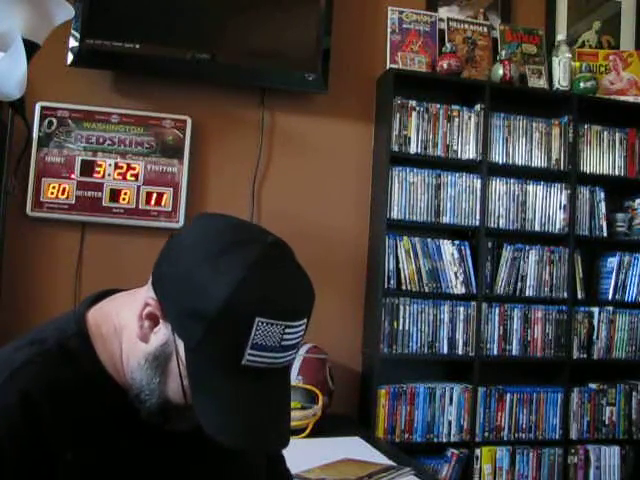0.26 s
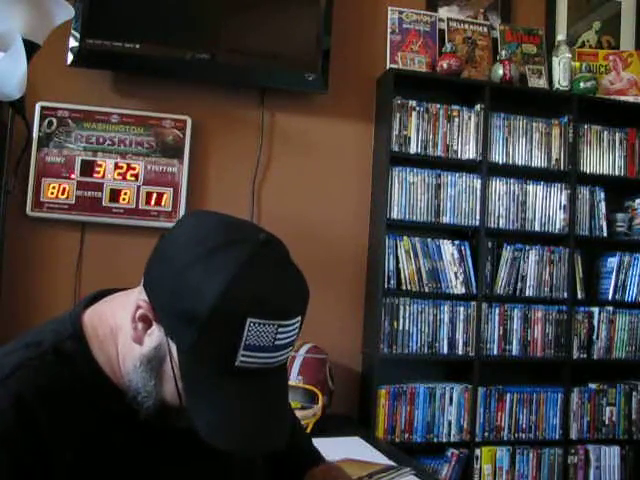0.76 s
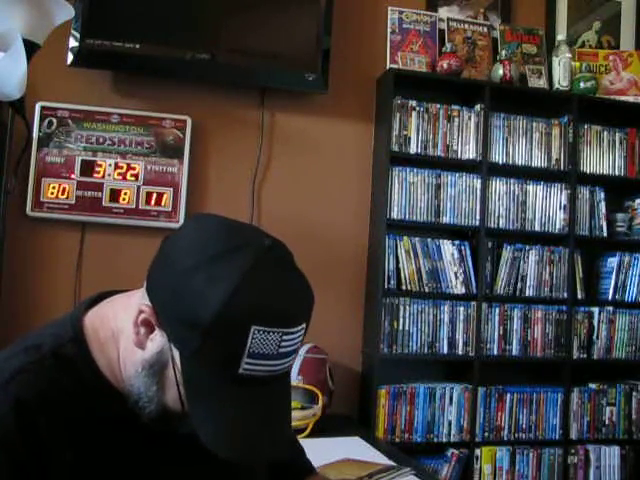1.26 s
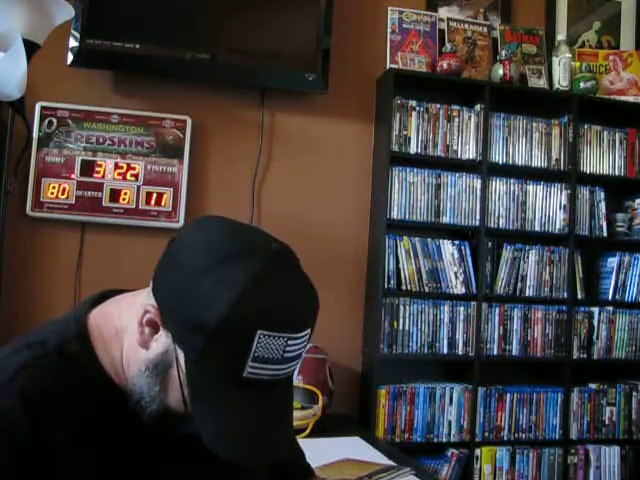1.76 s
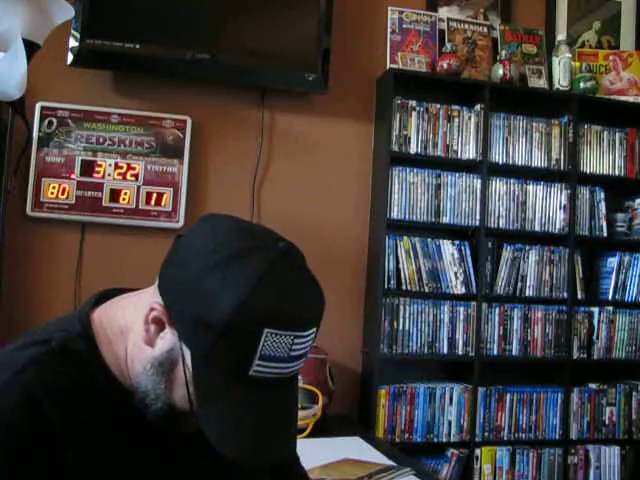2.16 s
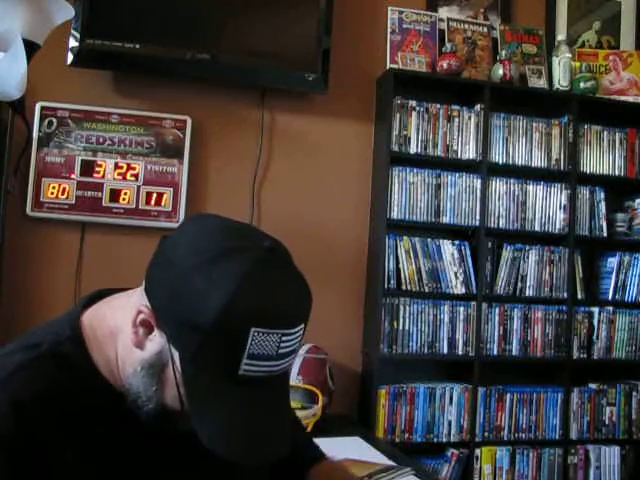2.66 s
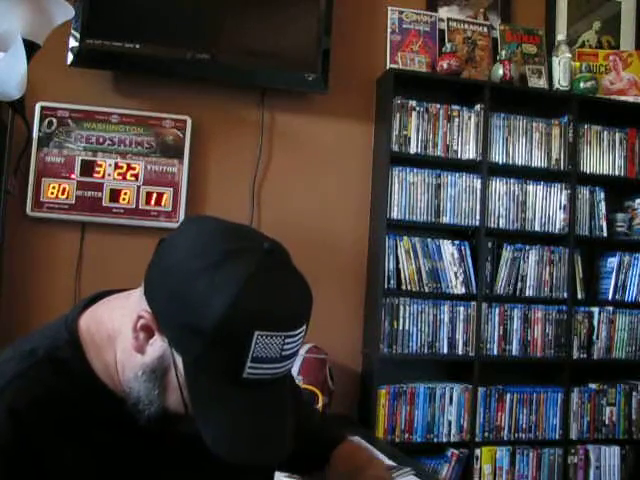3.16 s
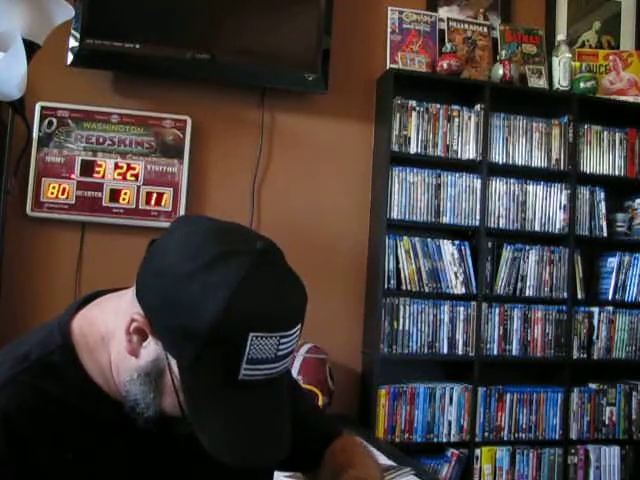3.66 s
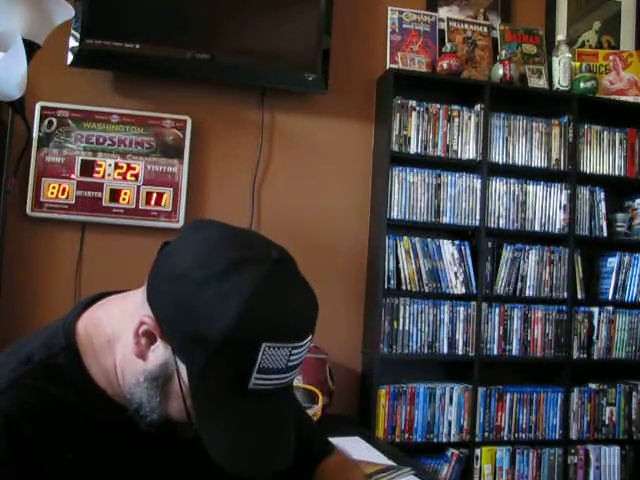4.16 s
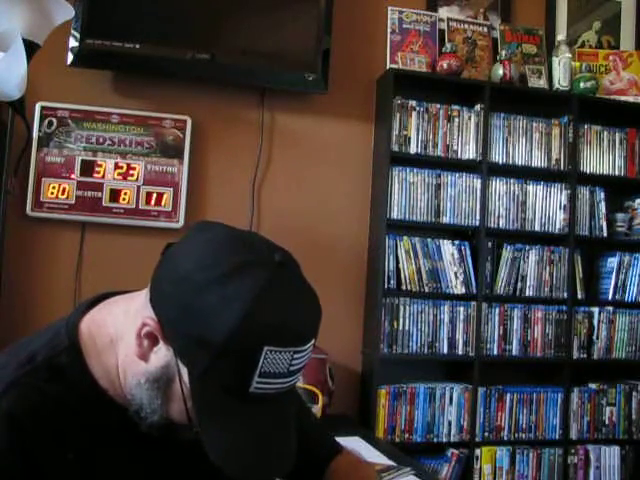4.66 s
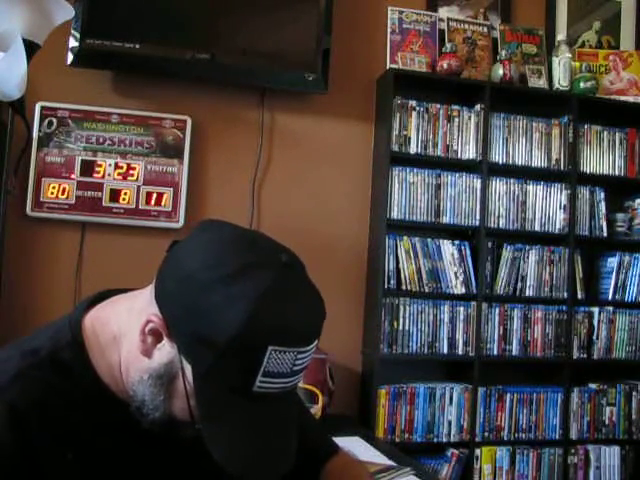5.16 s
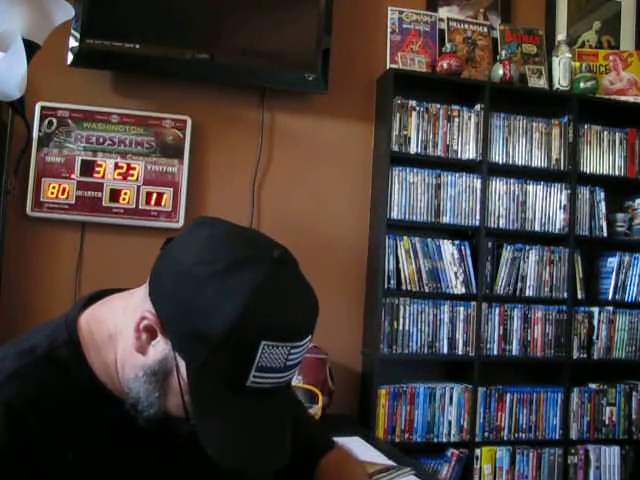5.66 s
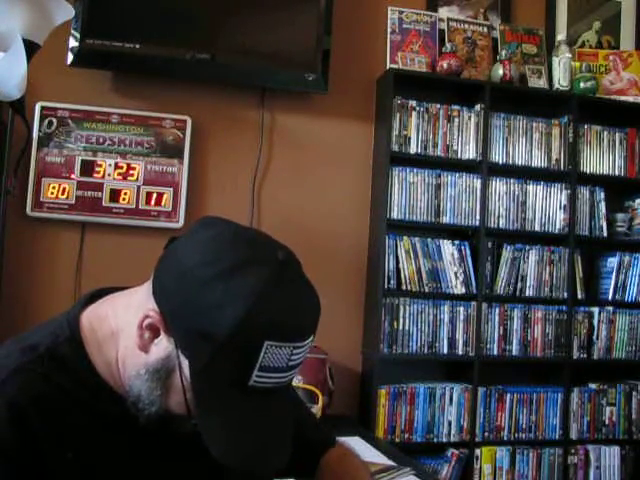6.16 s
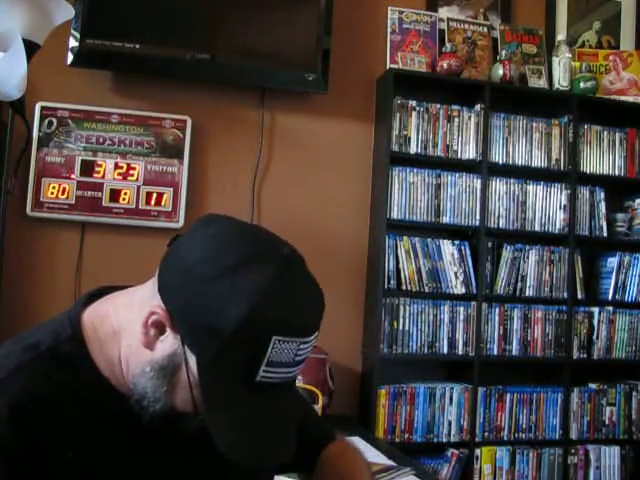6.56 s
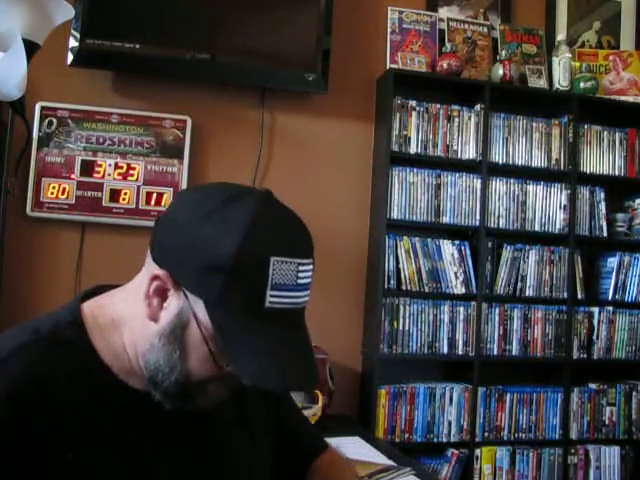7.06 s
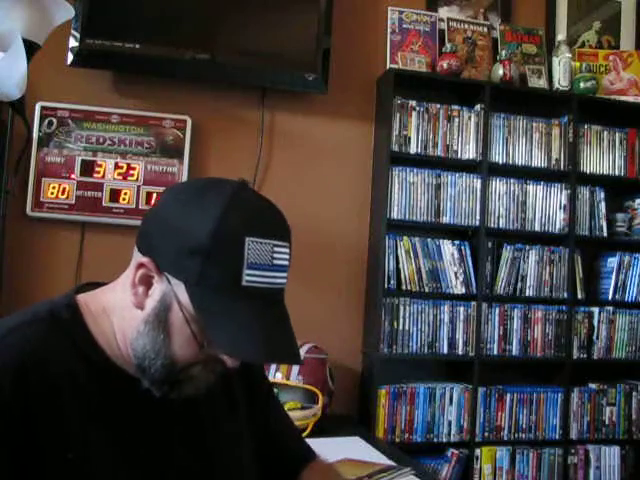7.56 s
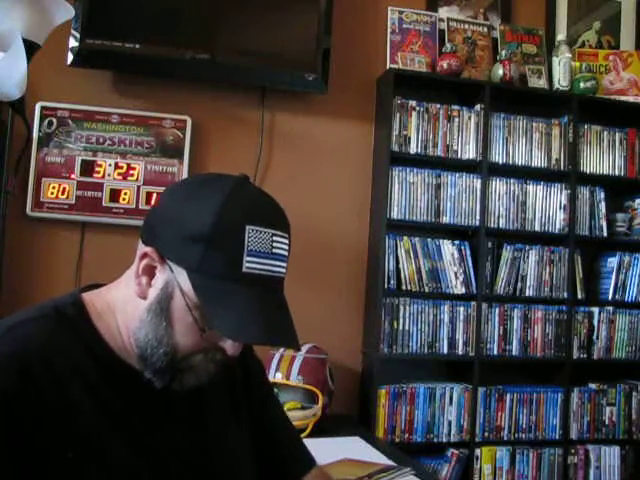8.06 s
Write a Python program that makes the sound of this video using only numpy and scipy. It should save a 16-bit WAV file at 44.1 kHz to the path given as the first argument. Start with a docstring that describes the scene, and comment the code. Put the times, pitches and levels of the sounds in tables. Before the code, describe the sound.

A package is being unwrapped close to the microphone in a small room with a short echo, over a faint electrical hum and low rumble. Two sharp snaps of stiff wrapping come right at the start, followed by a few light rustles. Around 2 seconds there is a brief scuff and a very short, sharp rip of packing tape. Sparse ticks and crackles follow until a small tape rasp near 4 seconds. From about 4.5 seconds the handling grows busier: hands drag over the wrapping with a slightly hollow rub, and tape rasps at 5 seconds and again near 6. The loudest stretch runs from about 6.3 to 7.7 seconds, with crinkling, hard snaps of buckling folds and a quick run of short tape pulls. Another rasp comes near 8 seconds, and rustling and snaps continue to the end at about 8.4 seconds.

```python
"""At a desk in a small furnished room, packing tape is pulled off a wrapped package.
The tape lets go in quick rasps as its threads of adhesive break. The stiff wrapping snaps
where a fold buckles, and rustles and crinkles as hands slide over it. All of it is coloured
by the package's panels and the short room tail. A faint mains hum and room rumble lie underneath."""
import sys
import numpy as np
from scipy import signal
from scipy.fft import rfft, irfft
from scipy.io import wavfile

SR = 44100
rng = np.random.default_rng(int(sys.argv[2]) if len(sys.argv) > 2 else 0)


def transcribe(signal):
    """Save signal, clipped to [-1, 1], as a 16-bit WAV file at the path in sys.argv[1]."""
    frames = np.atleast_2d(signal).T
    limited = np.clip(frames, -1, 1)
    pcm = np.round(limited * 32767).astype(np.int16)
    wavfile.write(sys.argv[1], SR, pcm)


N = 366030
TIME = np.arange(N) / SR


def from_db(db):
    """Decibels to gain."""
    return 10 ** (np.asarray(db) / 20)


def unit_energy(x):
    """Scale so that the squares sum to one."""
    return x / np.sqrt(np.sum(x ** 2) + 1e-20)


def add(track, start_s, sound):
    """Mix a short sound into a track."""
    at = max(round(start_s * SR), 0)
    track[at:at + len(sound)] += sound[:N - at]


def response(outline, size=2048):
    """Minimum-phase impulse response of an EQ curve given as (Hz, dB) points."""
    hz, db = np.transpose(outline)
    grid_hz = np.maximum(np.arange(size // 2 + 1) * SR / size, 1)
    gain = from_db(np.interp(np.log(grid_hz), np.log(hz), db))
    cepstrum = irfft(np.log(gain))
    causal = np.r_[1, np.full(size // 2 - 1, 2), np.zeros(size // 2)]
    return irfft(np.exp(rfft(cepstrum * causal)))


def through(x, impulse):
    """Filter x by an impulse response, keeping its length."""
    return signal.fftconvolve(x, impulse)[:len(x)]


def tint(x, body_db, treble_db, body_hz=850, treble_hz=5400):
    """Three-band EQ: weight the body and the treble against the middle."""
    def split(sound, hz):
        filters = [signal.butter(2, hz, kind, fs=SR, output="sos") for kind in ("low", "high")]
        return [signal.sosfilt(np.tile(sos, (2, 1)), sound) for sos in filters]
    low, rest = split(x, body_hz)
    middle, high = split(rest, treble_hz)
    return from_db(body_db) * low + middle + from_db(treble_db) * high


def resonate(x, resonances):
    """Lift one band for each damped resonance."""
    for hz, width_hz, lift_db in resonances:
        band = signal.lfilter(*signal.iirpeak(hz, hz / width_hz, fs=SR), x)
        x = x + (from_db(lift_db) - 1) * band
    return x


def drift(per_s, size=N):
    """A random wander with a spread near one."""
    knots = rng.standard_normal(int(size / SR * per_s) + 2)
    return np.interp(np.arange(size) * per_s / SR, np.arange(len(knots)), knots)


def grains(per_s, spread_db, size=N):
    """Tiny random clicks of uneven strength, at an rms of one."""
    fires = rng.random(size) < per_s / SR
    strength = from_db(spread_db * np.clip(rng.standard_normal(size), -2, 2))
    return unit_energy(fires * strength * rng.choice([-1, 1], size)) * np.sqrt(size)


def stereo(mid, side):
    """Left and right from mid and side; the microphone's close ports nearly agree in the bass."""
    # Stereo width. Each row: frequency in Hz, side gain in dB.
    width = [(100, -13.5), (400, -12.5), (650, -7.5), (1200, -7.5), (2500, -3), (8000, 0.5), (13000, 0)]
    return mid + through(side, response(width)) * np.array([[1], [-1]])


def room(x, wet_db, t60_s=0.29, build_s=0.0069, scatter_db=-7, scatter_s=0.00038):
    """Direct sound, scatter from the desk, two near echoes and a short diffuse tail."""
    # Tone of the tail. Each row: frequency in Hz, gain in dB.
    colour = [(150, -3.5), (400, -0.5), (1000, 2), (2200, 4), (4500, -0.5), (8000, -1.5), (14000, -0.5)]
    # Bounces off the nearest surfaces. Each row: delay in seconds, level in dB.
    echoes = [(0.0122, -12), (0.0192, -23)]
    t = TIME[:SR // 2]
    decay = from_db(-60 * t / t60_s) * np.clip(t / build_s, 0, 1)
    tails = [unit_energy(rng.standard_normal(len(t)) * decay) for _ in range(2)]
    mid, side = [from_db(wet_db) * through(tail, response(colour)) for tail in tails]
    mid[0] += 1   # direct sound
    side += from_db(scatter_db) * unit_energy(rng.standard_normal(len(t)) * np.exp(-t / scatter_s))
    for delay_s, db in echoes:
        mid[round(delay_s * SR)] += from_db(db)
    return np.array([through(x, channel) for channel in stereo(mid, side)])


def room_tone(air_db=-49.5, hum_hz=120, hum_db=-53, waver_db=-2.0):
    """A bed of rumble and hiss, with a wavering hum at twice the mains rate."""
    # Spectrum of the still room. Each row: frequency in Hz, relative level in dB.
    air = [(20, -4), (38, 3.5), (70, -4.5), (130, -6.5), (200, -10.5), (500, -16.5), (1000, -19.5),
           (2000, -22), (4300, -23), (7000, -26.5), (12000, -34), (16000, -40)]
    mid, side = [through(rng.standard_normal(N), unit_energy(response(air))) for _ in range(2)]
    hum = np.sqrt(2) * np.sin(2 * np.pi * hum_hz * TIME) * from_db(hum_db + waver_db * drift(7.1))
    return from_db(air_db) * stereo(mid, side) + hum


def package(x):
    """The damped panels of the package colour every sound made on it."""
    # Panel resonances. Each row: frequency in Hz, width in Hz, lift in dB.
    panels = [(304, 55, 5.5), (458, 95, 5), (800, 47, 1), (1475, 620, 3.5)]
    return resonate(x, panels)


def sliding_hands(catches_per_s=9000, creases_per_s=110, crinkle_db=-4, stroke_db=-3, hold_db=-4):
    """Fine friction under the hands, with sparse creases popping; each stroke swells and fades."""
    # Faint rustle of holding the package. Each row: time in seconds, relative level in dB.
    hold = [(0, -53.5), (1.6, -74), (2.1, -41), (2.45, -79), (3.8, -76), (4.3, -67), (4.6, -70), (5.1, -45),
            (5.58, -50), (5.8, -42.5), (6.08, -53), (6.45, -37), (7.4, -39), (7.85, -43.5), (8.3, -47)]
    # Hand strokes. Each row: middle and length in seconds, then relative level, body and treble in dB.
    strokes = [(0.452, .2, -50, -12, 1), (0.83, 0.062, -39.5, -7, -4.5), (1.36, 0.099, -51, 12.5, -25),
               (1.842, 0.066, -34.5, 0.5, 1), (1.988, .17, -44.5, 9.5, -8), (4.125, 0.19, -38.5, -1, 2.5),
               (4.323, 0.41, -48.5, 8, -2), (4.799, 0.34, -33.5, -6, -2), (4.88, 0.12, -34, 5, 5),
               (5.125, 0.06, -32, -6, 4), (5.356, 0.04, -42.5, -15, -8), (5.463, 0.12, -36.5, -1, -6),
               (5.528, 0.056, -39.5, 17, -35), (5.733, 0.082, -40.5, -17, 4), (5.933, 0.15, -26, -12, -0.5),
               (6.147, 0.11, -32, -3, -1), (6.239, 0.056, -39, 10, 7), (6.383, 0.063, -38, 2, -4),
               (6.567, 0.14, -24.5, -1, -11), (6.798, 0.11, -37.5, 11, -6), (7.026, 0.1, -22.5, -3, -4),
               (7.144, 0.4, -35, 1.5, -15), (7.336, 0.42, -37, 14.5, 2), (7.619, 0.1, -43.5, 22, -21),
               (7.971, 0.23, -30, 8.5, -4), (8.213, 0.47, -37.5, 9.5, -2)]
    # Tone of the rubbing. Each row: frequency in Hz, relative level in dB.
    colour = [(100, -14), (300, -5.5), (700, -6.5), (1400, -3), (2400, 0), (4500, 1.5), (6500, -3),
              (10000, -7), (16000, -19.5)]
    friction = grains(catches_per_s, spread_db=3) * from_db(2.5 * drift(per_s=70))
    rustle = friction + from_db(crinkle_db) * grains(creases_per_s, spread_db=9.5)
    grip = from_db(np.interp(TIME, *np.transpose(hold)) + hold_db)
    out = grip * tint(rustle, body_db=-2, treble_db=-3)
    for middle_s, length_s, db, body_db, treble_db in strokes:
        during = np.abs(TIME - middle_s) < length_s / 2
        swell = np.cos(np.pi * (TIME[during] - middle_s) / length_s) ** 1.95
        stroke = tint(swell * rustle[during], body_db, treble_db)
        add(out, middle_s - length_s / 2, from_db(db + stroke_db) * stroke)
    return through(out, unit_energy(response(colour)))


def wrapping_drag(start_s=4.64, peak_s=4.78, end_s=4.97, hz=1430, width_hz=400, gain_db=-40):
    """One long drag of the wrapping rubs a hollow resonance."""
    band = signal.butter(2, [hz - width_hz / 2, hz + width_hz / 2], "band", fs=SR, output="sos")
    rub = unit_energy(signal.sosfilt(band, grains(per_s=1500, spread_db=4))) * np.sqrt(N)
    return from_db(gain_db) * rub * np.interp(TIME, [start_s, peak_s, end_s], [0, 1, 0])


def wrapping_snaps(share, crumple_s=0.0014, rebound=0.6, crack=0.44, gain_db=25.5):
    """Each fold in the slice `share` gives way with a crack that rebounds briefly through the creases."""
    # Buckling folds. Each row: start in seconds, then relative level, body and treble in dB.
    folds = [(0.0448, -28, -19, 10), (0.1063, -22, -5.5, -6.5), (0.832, -55.5, -12, 23.5),
             (1.111, -55.5, 16, -27), (1.4329, -45.5, 7, 12), (2.0071, -35.5, -8, -26),
             (2.283, -53, 17, -6), (2.836, -31.5, 5.5, -7), (3.05, -47, 3, -14), (3.1594, -44, -6, 8),
             (3.674, -44.5, -17, 20.5), (3.7949, -48, 15.5, -23), (4.402, -21, 0, -35),
             (5.2105, -35.5, -0.5, 5.5), (5.6201, -25.5, -5.5, -30), (5.6436, -24.5, -11, 11),
             (6.3162, -35, 1.5, 18.5), (6.385, -14.5, -2.5, 3), (6.3991, -23, -2, -4),
             (6.4894, -29, 6.5, 10), (6.659, -17.5, -10, 5.5), (7.488, -14, -5, 3.5),
             (7.5839, -20, -3.5, -25), (7.658, -13.5, -4, 7), (7.951, -22, 3, 19.5),
             (8.186, -24.5, 0.5, -14), (8.204, -18.5, -24, -18)]
    # Tone of a snap. Each row: frequency in Hz, relative level in dB.
    colour = [(100, -19), (320, 3), (700, -2), (1400, -0.5), (2400, 4), (4000, 2.5), (6500, -8),
              (10000, -19.5), (16000, -34.5)]
    out = np.zeros(N)
    for start_s, db, body_db, treble_db in folds[share]:
        snap = signal.unit_impulse(SR // 25)
        for lag_s in crumple_s * np.geomspace(0.1, 0.7, 4) * rng.uniform(0.7, 1.3, 4):
            loop = np.r_[1, np.zeros(int(lag_s * SR)), rebound * rng.choice([-1, 1])]
            snap = signal.lfilter(loop[::-1], loop, snap)   # all-pass: smears without adding a pitch
        peak = np.argmax(np.abs(snap))
        snap[peak] += crack * np.sign(snap[peak])   # one crease takes most of the strain
        add(out, start_s, from_db(db + gain_db) * tint(unit_energy(snap), body_db, treble_db))
    return through(out, unit_energy(response(colour)))


def peeling_tape(share, breaks_per_s=12000, judder_per_s=350, judder_db=3.5, gain_db=-0.5):
    """On each pull in the slice `share`, adhesive threads break in clumps as the tape sticks and slips."""
    # Tape pulls. Each row: start and length in seconds, then relative level, body and treble in dB.
    pulls = [(1.781, 0.014, -44.5, 8, 4), (1.809, 0.012, -33, -1, 0.5), (2.0661, 0.0051, -14.5, 7.5, 4.5),
             (2.708, 0.045, -44.5, -1, 3), (3.906, 0.029, -31, 14, 2), (4.071, 0.037, -40.5, 8, 3.5),
             (4.392, .01, -37, 17.5, -18), (4.975, 0.038, -21.5, -2.5, 1.5), (5.711, 0.012, -39, -16, 9),
             (5.909, 0.018, -19, -9, 2.5), (6.524, 0.021, -21, 3, 6.5), (6.581, 0.011, -23, 3, 5.5),
             (6.861, 0.057, -21, 3.5, 6), (6.931, 0.063, -21.5, -2, 10), (7.253, 0.015, -23, 7, 1),
             (7.273, 0.063, -18, -4, 5), (7.392, 0.012, -21, -25, 2.5), (7.894, 0.019, -32.5, -2, 4),
             (7.924, 0.035, -24.5, 0, 4.5)]
    # Ring of the free strip. Each row: frequency in Hz, width in Hz, lift in dB.
    strip = [(2420, 330, 1.5), (4050, 1780, 5.5)]
    # Tone of the rasp. Each row: frequency in Hz, relative level in dB.
    colour = [(100, -42), (300, -12), (750, -6), (1300, -4), (2200, -0.5), (4200, -1.5), (6500, -4.5),
              (10500, -9), (12500, -17.5), (16000, -24.5)]
    attack_s, let_go_s = 0.0036, 0.0093
    surge_period_s, first_surge_s, surge_db = 0.024, 0.012, 4
    out, t = np.zeros(N), TIME[:SR // 4]
    attack = np.clip(t / attack_s, 0, 1)
    surges = from_db(surge_db * np.cos(2 * np.pi * (t - first_surge_s) / surge_period_s))
    for start_s, length_s, db, body_db, treble_db in pulls[share]:
        release = np.exp(-np.maximum(t - length_s, 0) / min(let_go_s, length_s / 2))
        pull = attack * release * surges
        breaks = grains(breaks_per_s, spread_db=-1.5, size=len(t))
        judder = from_db(judder_db * drift(judder_per_s, size=len(t)))
        rasp = unit_energy(breaks * judder * pull) * np.sqrt(np.sum(pull ** 2))
        add(out, start_s, from_db(db + gain_db) * tint(rasp, body_db, treble_db))
    return through(resonate(out, strip), unit_energy(response(colour)))


def scene(pan_db=0.16, handling_db=-2):
    """The package lies nearly straight ahead; its parts reach the microphone by different paths."""
    # Pulls take turns among three paths through the room, snaps between two.
    rasps = sum(room(package(peeling_tape(slice(i, None, 3))), wet_db=-4.5) for i in range(3))
    snaps = sum(room(package(wrapping_snaps(slice(i, None, 2))), wet_db=-2) for i in range(2))
    rubbing = room(package(sliding_hands() + wrapping_drag()), wet_db=-2)
    channel_gains = from_db(handling_db + np.array([[-pan_db], [pan_db]]))
    return (rasps + snaps + rubbing) * channel_gains + room_tone()


def gain_control(x, threshold_db=-23, slope=0.7, attack_s=0.2, release_db_per_s=0.7):
    """A long loud sound turns the gain down, and it recovers slowly."""
    pole = np.exp(-1 / (attack_s * SR))
    power = signal.lfilter([1 - pole], [1, -pole], np.mean(x ** 2, axis=0))
    cut_db = slope * np.maximum(10 * np.log10(power + 1e-12) - threshold_db, 0)
    recovery_db = release_db_per_s * TIME
    return x * from_db(recovery_db - np.maximum.accumulate(cut_db + recovery_db))


def record(dry):
    """Gain control, softly rounded peaks and a high cut at 16 kHz."""
    rounded = np.tanh(gain_control(dry))
    lowpass = signal.firwin(255, 16000, fs=SR)
    return signal.fftconvolve(rounded, lowpass[None], mode="same", axes=1)


dry = scene()
out = record(dry)
transcribe(out)
```